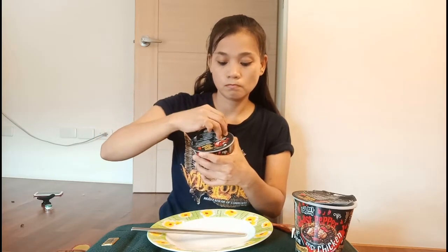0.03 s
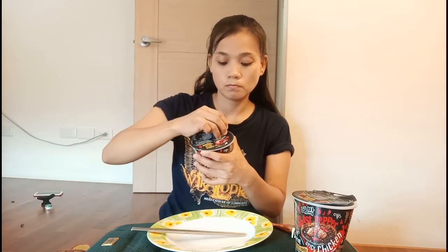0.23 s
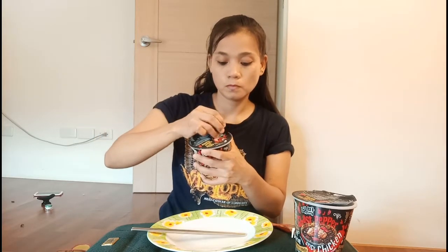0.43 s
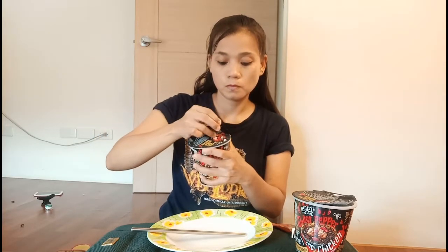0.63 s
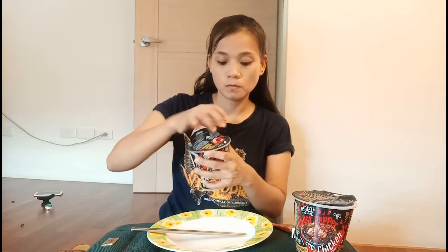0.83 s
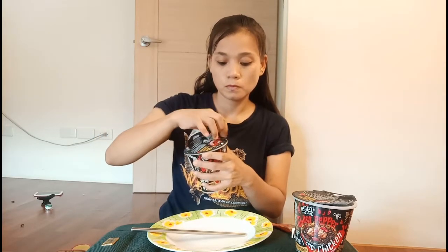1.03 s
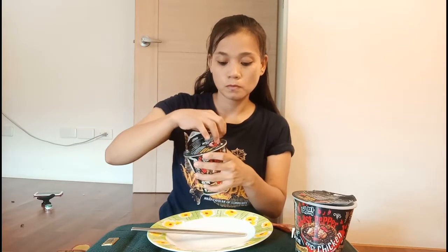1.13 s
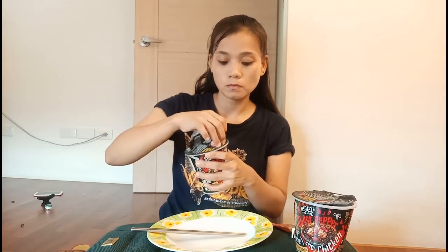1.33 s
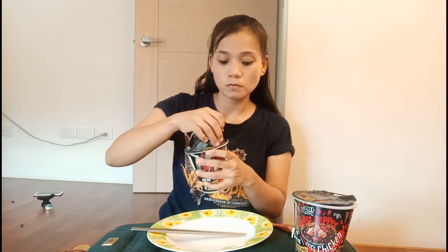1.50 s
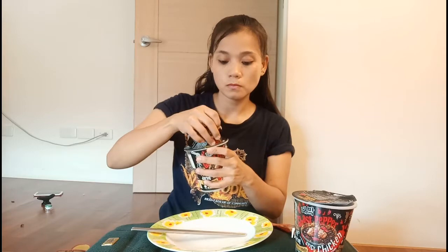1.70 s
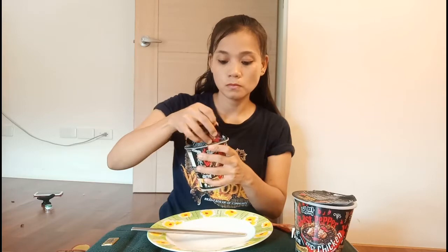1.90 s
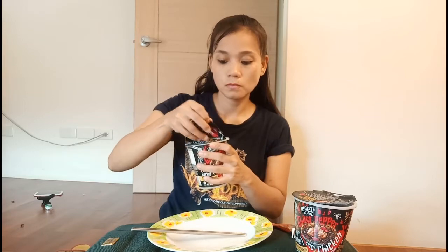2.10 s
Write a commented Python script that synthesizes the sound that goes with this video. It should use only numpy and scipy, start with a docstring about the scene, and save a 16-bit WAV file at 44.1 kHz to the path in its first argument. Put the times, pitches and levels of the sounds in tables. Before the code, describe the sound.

Close to the microphone, a lid is peeled from a plastic noodle cup in uneven scrapes and snaps. The thin cup pops hollowly, the crackling eases, then resumes, over faint hum in a small, hard-walled room.

```python
"""A short plastic scrape, then clicks: fingers pick and pull at the lid of a noodle cup, close by.
Lid and rim give way in snaps, and each pull scrapes out a run of tiny slips (stick-slip friction).
These impulses excite the resonances of the cup's wall and air; the thin wall also buckles with a
hollow thump. All of it reverberates in a small, hard-walled room, over faint noise and a low hum."""
import sys
import numpy as np
from scipy import signal
from scipy.fft import rfft, irfft
from scipy.io import wavfile
from scipy.ndimage import uniform_filter1d

SR = 44100
rng = np.random.default_rng(int(sys.argv[2]) if len(sys.argv) > 2 else 0)


def store_pcm(level_fs):
    """Save levels as 16-bit WAV."""
    pcm = np.round(np.clip(level_fs, -1, 1) * 32767).astype(np.int16)
    wavfile.write(sys.argv[1], SR, np.atleast_2d(pcm).T)


N = 94815


def amp(db):
    """Amplitude ratio of a level in decibels."""
    return 10 ** (np.asarray(db) / 20)


def unit(x):
    """Normalisation to rms 1."""
    return x / np.sqrt(np.mean(x ** 2) + 1e-20)


def read(points, hz):
    """Interpolation of a table on a log-frequency axis."""
    f, value = np.transpose(points)
    return np.interp(np.log(hz + 1), np.log(f + 1), value)


def add(mix, start, sound):
    """Superposition: a sound joins the mix at a time in seconds."""
    part = mix[max(round(start * SR), 0):][:len(sound)]
    part += sound[:len(part)]


def bins(size):
    """Frequencies of a discrete spectrum."""
    return np.fft.rfftfreq(size, 1 / SR)


def minimum_phase(db):
    """Minimum phase gives the sharpest causal impulse response with this spectrum."""
    cepstrum = irfft(np.log(amp(db)))
    half = len(cepstrum) // 2
    fold = np.r_[1, np.full(half - 1, 2), 1, np.zeros(half - 1)]
    return irfft(np.exp(rfft(cepstrum * fold)))[:half]


# Spectral density of the room noise: f/Hz, relative level/dB
NOISE_SPECTRUM = [(15, -40), (25, -4.5), (64, -6), (126, 1.5), (193, -2.5), (359, 0), (537, -8.5),
                  (666, -5.5), (895, -9), (3090, -12.5), (6730, -25.5), (14300, -24.5), (15500, -38)]
# Likeness of the noise at the two ears: f/Hz, correlation coefficient
NOISE_CORRELATION = [(30, 0.11), (120, 0.56), (300, 0.3), (900, 0.13), (3000, 0.071)]

def background(noise_db=-58, hum_db=-71, hum_hz=117, half_width_hz=4.7):
    """Partly coherent room noise, and a narrow noise band whose components beat as a wavering hum."""
    hz = bins(size=2 * N)
    left, independent, hum_noise = rfft(rng.standard_normal((3, 2 * N)))
    correlation = read(NOISE_CORRELATION, hz)
    right = correlation * left + np.sqrt(1 - correlation ** 2) * independent
    air = irfft(np.array([left, right]) * amp(read(NOISE_SPECTRUM, hz)))[:, :N]
    hum = irfft(hum_noise / (1 + ((hz - hum_hz) / half_width_hz) ** 2))[:N]
    return amp(noise_db) * unit(air) + amp(hum_db) * unit(hum)


# Reverberation time: f/Hz, T60/s
ROOM_DECAY = [(150, 0.36), (500, 0.23), (1500, 0.32), (4000, 0.26), (9000, 0.31), (15000, 0.23)]

def diffuse_field(size, gap_s=0.00061, build_s=0.001, evenness=0.36):
    """Dense reflections decay exponentially; returns the flattened spectra of two independent tails."""
    hz, t, noise = signal.stft(rng.standard_normal((2, size)), SR, nperseg=256)
    decay = amp(-60 * t / read(ROOM_DECAY, hz)[:, None])
    tails = signal.istft(noise * decay, SR, nperseg=256)[1][:, :size]
    tails *= np.clip((np.arange(size) / SR - gap_s) / build_s, 0, 1)
    spectra = rfft(tails)
    # soften the narrow peaks, then level the broad colour
    peaks_db = 10 * np.log10(abs(uniform_filter1d(abs(spectra) ** 2, size=12, axis=1)) + 1e-9)
    spectra *= np.array([rfft(minimum_phase(-evenness * db), size) for db in peaks_db])
    return spectra / np.sqrt(uniform_filter1d(abs(spectra) ** 2, size=200, axis=1))


# Width of the reflections, side over mid: f/Hz, level/dB
ECHO_WIDTH = [(100, -5), (330, -12.5), (650, -5.5), (1200, -3), (2200, -1.5), (5000, 0.5), (12000, 1.5)]
# Reverberant over direct sound: f/Hz, level/dB
ECHO_RATIO = [(300, 0), (800, 6), (2000, 5), (6000, 8)]
# Interaural level difference, left over right: f/Hz, level/dB
EAR_BALANCE = [(150, 2), (330, -1.6), (700, 2), (1400, 2), (2800, 0), (12000, 0.5)]

def room(source):
    """Direct and reverberant fields superpose; the reflections widen toward the treble."""
    size = SR // 2
    hz = bins(size)
    mid, side = diffuse_field(size)
    ear = np.array([[1], [-1]])  # left, right
    width, wet = amp(read(ECHO_WIDTH, hz)), amp(read(ECHO_RATIO, hz))
    echoes = (mid + ear * width * side) / np.sqrt(1 + width ** 2)
    direct = np.exp(-1j * np.pi * hz * (1 - ear) / SR)  # one sample later on the right
    balance = amp(ear * read(EAR_BALANCE, hz) / 2)
    transfer = (direct + wet * echoes) / np.sqrt(1 + wet ** 2) * balance
    lead = size // 10  # space for the filters' pre-ringing
    response = np.roll(irfft(transfer), lead, axis=1)
    return signal.fftconvolve(source[None], response, axes=1)[:, lead:lead + N]


# Broad frequency response of the cup: f/Hz, relative level/dB
CUP_COLOUR = [(40, -39), (120, -24), (210, -11.5), (340, -4.5), (440, -6.5), (590, -0.5), (830, -5.5),
              (1150, -11.5), (1450, -11), (1950, -3.5), (2600, -11), (3100, -6), (4300, -11), (5000, -16.5),
              (7500, -23), (9200, -32.5), (12500, -40), (15000, -36)]
# Resonance peaks and dips of the cup: f/Hz, bandwidth/Hz, gain/dB
CUP_RESONANCES = [(363.4, 48, 6.5), (420, 47, -9), (490, 24, 8), (581.3, 28.6, 7.5), (643.6, 8.7, 10.5),
                  (709, 63, 10), (764, 31, 3), (890, 13, 11), (1390, 47, 10.5), (1670, 12, 8),
                  (1790, 90, 0), (1948, 24, 5), (2117, 27, 5), (2430, 43, 10.5), (3560, 10, -3),
                  (3876, 18.4, 2)]

def cup(force, gain_db=31.5):
    """Resonance: the cup's wall and enclosed air ring with every push."""
    hz = bins(size=16384)
    resonances_db = sum(db / (1 + (2 * (hz - f) / width) ** 2) for f, width, db in CUP_RESONANCES)
    response = minimum_phase(read(CUP_COLOUR, hz) + resonances_db)
    return amp(gain_db) * signal.fftconvolve(force, response / np.linalg.norm(response))[:N]


# Thumps of the wall: t/s, f/Hz, level/dB, T60/s
WALL_BUCKLES = [(0.595, 374, -10.5, 0.058), (.605, 320.4, -10, 0.047), (0.646, 362, -18, 0.023),
                (0.8413, 375, -21, 0.011), (0.999, 372, -40.5, 0.16), (1.031, 116, -41, 0.066),
                (1.247, 344, -45, 0.079), (1.401, 606, -15.5, 0.014), (1.402, 331, -23, 0.031),
                (1.87, 340, -26, 0.059), (1.923, 354, -30, 0.053), (2.073, 502, -26, 0.1),
                (2.11, 482, -27, 0.089)]

def buckles(rise_share=0.056):
    """Buckling: the thin wall pops in with a low note that the hand damps at once."""
    out, t = np.zeros(N), np.arange(SR // 5) / SR
    for start, hz, db, t60 in WALL_BUCKLES:
        rise = (1 - np.exp(-t / (rise_share * t60))) ** 2
        decay = amp(db - 60 * t / t60)
        add(out, start, rise * decay * np.sin(2 * np.pi * hz * t))
    return out


def push(level_db, weight_db, hollow_db, bright_db, patch_hz):
    """Dispersion: a push rings a patch of plastic; bending waves smear and colour it anew each time."""
    patch_db, relative_width = 10, 0.17
    smear_s, ripple_db = 0.0016, 4
    hz = bins(size=2048)
    # f/Hz, level/dB; the highest treble follows brightness more steeply
    tone = [(387, weight_db), (642, hollow_db), (1830, 0), (2990, 0),
            (5430, bright_db), (13000, 1.16 * bright_db)]
    resonance = patch_db / (1 + (2 * (hz / patch_hz - 1) / relative_width) ** 2)
    noise = rng.standard_normal((2, len(hz)))
    ripple, lag = uniform_filter1d(uniform_filter1d(noise, size=10), size=10)
    bending = np.minimum(hz / 1830, 1)  # ripple and smear shrink toward the bass
    click = minimum_phase(read(tone, hz) + resonance + ripple_db * bending * unit(ripple))
    group_delay = smear_s * bending * abs(unit(lag))
    phase = -2 * np.pi * np.cumsum(group_delay) * hz[1]
    smeared = irfft(rfft(click, 2 * len(click)) * np.exp(1j * phase))
    return amp(level_db) * smeared[:len(click)]


# Scrapes: t/s, duration/s, relative level/dB, weight/dB, hollowness/dB, brightness/dB, patch f/Hz
LID_PULLS = [(0, 0.023, -41, -1.5, 2, 1, 582), (0.036, 0.047, -52, -24, 0, -22, 850),
             (0.168, 0.088, -48, 3, -18, -15, 1920), (0.229, .09, -43, 2, 8, 7, 2040),
             (0.362, 0.084, -50, 10, 12.5, 11, 1900), (0.452, 0.037, -33.5, 6.5, 6.5, 3.5, 3900),
             (0.496, 0.16, -42.5, 0.5, -4.5, 0.5, 2220), (0.644, 0.044, -36, 4.5, 3, 0, 1470),
             (0.753, 0.056, -56, 10.5, -12, 6, 2880), (0.834, 0.02, -48.5, 0, 5, 0, 2310),
             (1.089, 0.047, -57, 14, 3, -1, 3400), (1.19, 0.14, -79, -22, -13, -6, 3530),
             (1.363, 0.12, -49.5, -8, 7, 3, 2280), (1.416, .065, -38, -5, -6, 1.5, 3080),
             (1.455, 0.13, -43.5, -16, -0.5, -2, 2120), (1.54, 0.098, -37, 4.5, -1.5, -10.5, 1024),
             (1.62, 0.096, -48, 1, 5, -5.5, 1400), (1.803, 0.032, -51.5, 12, 20, -15, 2260),
             (1.827, 0.066, -41, 8, 3, -6.5, 1020), (1.896, 0.051, -42.5, 10.5, 0.5, -10.5, 1070),
             (1.997, 0.087, -60.5, 15.5, 10, 0, 910), (2.065, .14, -41, 3, 3.5, -6.5, 2210)]

def pulls(slips_per_s=900, spread_db=1.5, skew=0.49, roundness=0.31, gain_db=-32):
    """Stick-slip friction: each pull swells and fades as a run of tiny uneven slips."""
    out = np.zeros(N)
    slipping = rng.random(N) < slips_per_s / SR
    strength = amp(spread_db * rng.exponential(1, N))
    slips = slipping * strength * rng.choice([-1., 1.], N)
    for start, duration, *touch in LID_PULLS:
        run = unit(slips[round(start * SR):][:round(duration * SR)])
        swell = abs(np.sin(np.pi * np.linspace(0, 1, len(run)) ** skew)) ** roundness
        add(out, start, signal.fftconvolve(run * swell, push(*touch)))
    return amp(gain_db) * out


# Clicks: t/s, relative level/dB, weight/dB, hollowness/dB, brightness/dB, patch f/Hz
LID_SNAPS = [(0.156, -51, 9.5, -9, -2, 2050), (.174, -50.5, 6.5, 5.5, -1, 1900),
             (.204, -41, -8, 4, 8.5, 3400), (.236, -42, 10, -12, 4.5, 2080), (.240, -35, 1, 1.5, 2, 1910),
             (.251, -41, 2, 5, 6.5, 1910), (.269, -35.5, 3, -13, 1, 1896), (.292, -48, -8, -6, 7, 1930),
             (.298, -42.5, 5.5, 3.5, 3, 2070), (.3685, -37, -10, -13, -5, 2180),
             (.3745, -46, -6, -27, -24, 2320), (.3865, -39.5, -16, -8, 0, 1980),
             (.428, -42, 10, -11, 5, 2540), (.435, -35.5, -27, -27, 1.5, 3120),
             (.4495, -36.5, 3.5, -24, 6.5, 2250), (.5495, -44.5, 10, -1, -2, 2530),
             (0.576, -46, -3, 8, 1, 2140), (0.587, -37.5, -42, 3, -4, 4070), (.5965, -41.5, 15, 13, 3, 810),
             (0.622, -35.5, -19, -6, 7, 4500), (.6355, -26.5, 9, 3.5, -13.5, 1610),
             (.644, -30, 3.5, 4, -1.5, 1440), (.649, -31.5, 9.5, 12, -5, 1770),
             (.663, -38, 10.5, -7, -11, 1760), (.764, -50, -15, -9, -6, 2050),
             (.8405, -51.5, 17, 14.5, 2.5, 1400), (0.864, -50.5, 6, -4, 1, 2410),
             (1.064, -69, 13, 17, 15, 3440), (1.1445, -48, -3, -2.5, 7.5, 3550),
             (1.255, -64, -7, 9, -2, 3750), (1.275, -56.5, -8, 2.5, -2.5, 970),
             (1.349, -59, -17, 10, 1, 2240), (1.373, -62, -14, -7, -1, 2340),
             (1.401, -29, 5, 4.5, -10.5, 1780), (1.415, -36, -5, -7, -25, 1940),
             (1.421, -36, -2, -11, -3, 3100), (1.451, -42.5, 10.5, -3, 4, 3020),
             (1.517, -43.5, -1, -7, 1, 2290), (1.5565, -38.5, 8.5, 6, -26, 1780),
             (1.575, -40, -3, 1, -5, 1790), (1.586, -40.5, -21, 0, -12, 3060),
             (1.613, -43.5, 2, 10, -22, 1800), (1.7975, -47.5, -17, 5.5, -5.5, 3100),
             (1.8225, -45, -21, 1.5, 0.5, 1370), (1.926, -43.5, -6.5, -1, -7, 1296),
             (1.988, -66, 9, 12, 4, 666), (2.0295, -45, 1.5, 2, 5, 2960), (2.096, -46.5, 3, 7, -25, 2130)]

def snaps():
    """Impulsive excitation: the lid and rim give way in single clicks."""
    out = np.zeros(N)
    for start, *touch in LID_SNAPS:
        add(out, start, push(*touch))
    return out


def scene():
    """Source and filter: snaps and pulls drive the cup, whose sound joins the thumps in the room."""
    return room(cup(snaps() + pulls()) + buckles()) + background()


def record(dry, cutoff_hz=15600):
    """Band limiting: a linear-phase low-pass removes the highest treble."""
    lowpass = signal.firwin(511, cutoff_hz, window=("kaiser", 9), fs=SR)
    return signal.oaconvolve(dry, lowpass[None], "same")


dry = scene()
out = record(dry)
store_pcm(out)
```